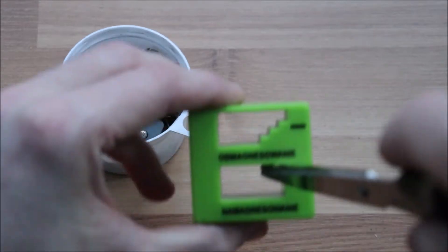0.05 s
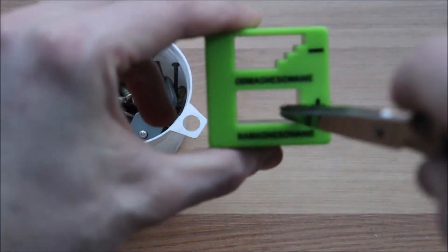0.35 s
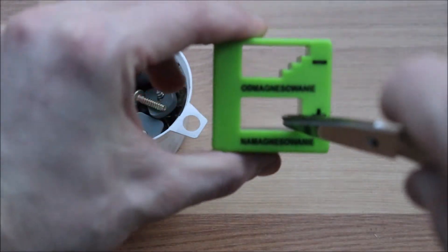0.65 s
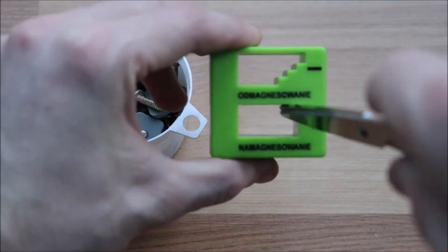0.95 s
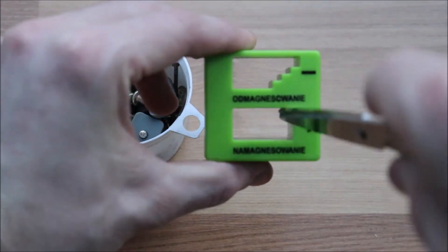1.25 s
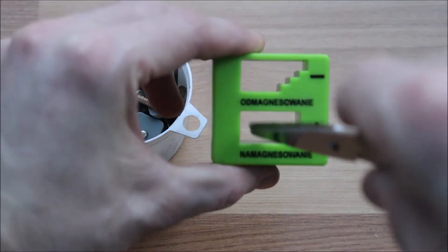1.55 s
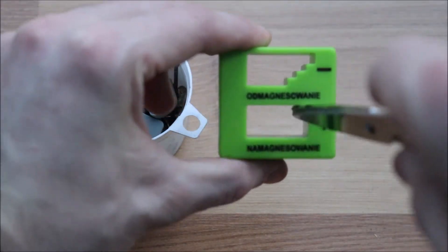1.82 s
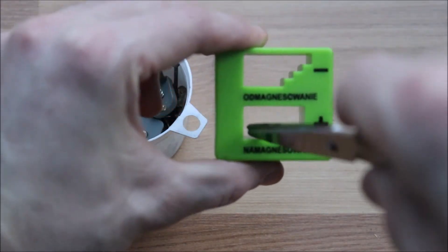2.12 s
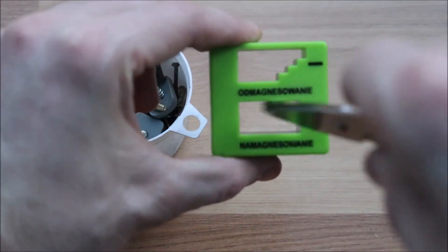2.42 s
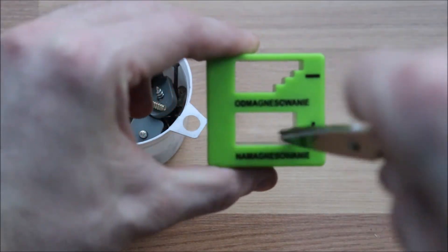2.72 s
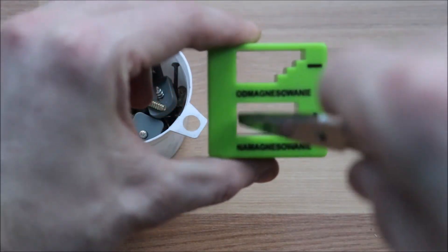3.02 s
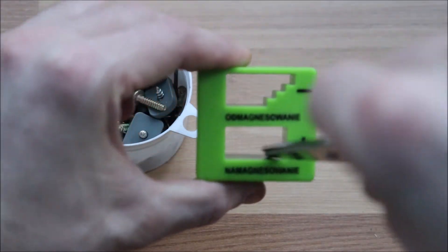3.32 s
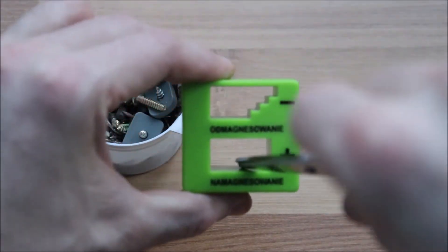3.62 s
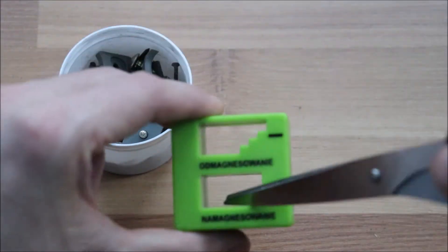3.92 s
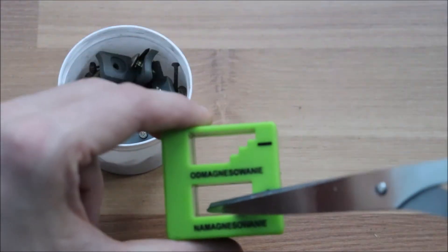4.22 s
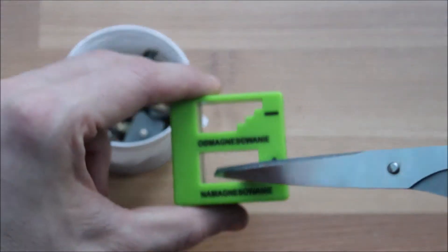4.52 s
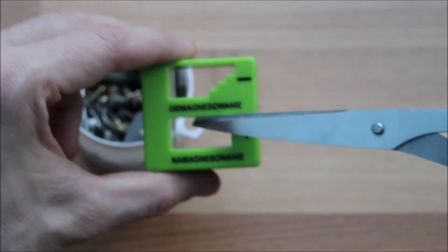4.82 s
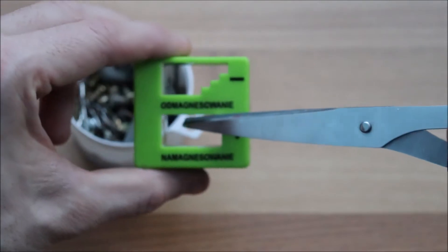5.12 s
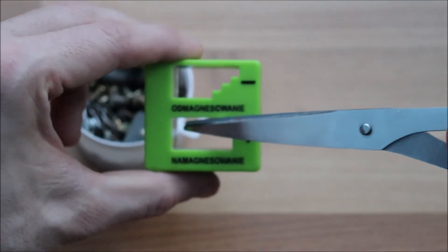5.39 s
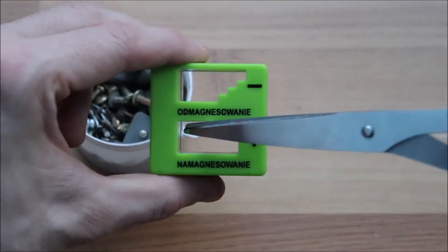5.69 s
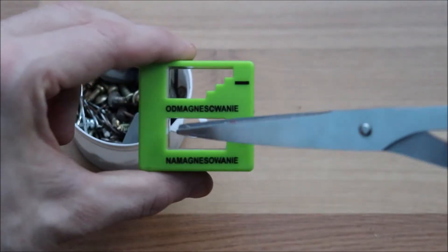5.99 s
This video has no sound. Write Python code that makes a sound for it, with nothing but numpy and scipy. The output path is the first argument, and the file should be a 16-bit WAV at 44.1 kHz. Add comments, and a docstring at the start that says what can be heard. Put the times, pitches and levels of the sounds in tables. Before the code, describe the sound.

Fingers rub faintly on a small plastic magnetizer, and at about 0.3 seconds a steel scissor blade hits the end of its slot with a hollow snap, followed by a few light ticks. From 1 to 3.3 seconds the blade is stroked to and fro five times, roughly two strokes a second. Hard, bright snaps near 1, 1.4, 1.9, 2.5 and 2.9 seconds alternate with softer clacks on the way back. Between them the steel scrapes briefly, catches and ticks along the plastic, getting busier toward 3 seconds. Then it turns sparse: faint grazes, a light tap near 4 seconds, soft finger rubs and bumps around 4.4, a short scrape into a clearer hollow click at 4.7, and a smaller tap at 5.4. The hand settles softly near 6 seconds. Everything is very close, in stereo, in a small quiet room with faint background hiss.

```python
"""Scissor blade in a magnetizer

Close stereo pair, just above a wooden table in a small quiet room. A steel blade is stroked five times
to and fro through the slot of a hand-held plastic magnetizer. The magnets snap it against the upper and
lower bar in turn; between the snaps it scrapes and ticks along the plastic. Fingers shift on the case."""
import sys
import numpy as np
from scipy import signal
from scipy.fft import rfft, irfft, next_fast_len
from scipy.io import wavfile
from scipy.ndimage import uniform_filter1d, map_coordinates

SR = 44100
rng = np.random.default_rng(int(sys.argv[2]) if len(sys.argv) > 2 else 0)


def log_audio(samples):
    """Write samples as a 16-bit WAV file to the path given in sys.argv[1]."""
    # one column per channel
    frames = np.atleast_2d(samples).T
    # limit to full scale, then quantise
    limited = np.clip(frames, -1, 1)
    pcm = np.round(limited * 32767).astype(np.int16)
    wavfile.write(sys.argv[1], SR, pcm)


N = 271215
LEN = 16384  # samples in one contact with its tail
T, HZ = np.arange(LEN) / SR, np.fft.rfftfreq(LEN, 1 / SR)

# Snap and contact levels are relative within each source; tilt is brightness above 1 kHz.
# strokes on the upper bar: t/s, snap/dB, tilt/(dB/octave), run-in/dB, length/s, slide/dB
UPPER_STROKES = [(0.9666, -6, .5, -42.5, 0.18, -61), (1.3594, -10, 0.5, -40.5, 0.2, -51.5),
                 (1.8907, -10, -2.5, -48, 0.18, -46.5), (2.4569, -4.5, -1, -62, .12, -41.5),
                 (2.9404, -6, -2, -54, .123, -39.5)]
# return strokes on the lower bar: t/s, snap/dB, length/s, slide/dB
LOWER_STROKES = [(1.2251, -16, 0.072, -56), (1.694, -14.5, .092, -46), (2.175, -11.5, 0.17, -41.5),
                 (2.713, -13, .11, -38), (3.1684, -12, 0.11, -36.5)]
# the sliding edge catches, fingers bump the case: t/s, level/dB
CATCHES = [(.634, -45), (1.476, -32), (1.780, -27), (2.264, -28.5), (2.288, -21), (2.348, -33.5),
           (2.758, -24), (2.788, -22.5), (3.008, -23.5)]
BUMPS = [(1.619, -39.5), (4.369, -51.5), (4.487, -55), (4.610, -52)]
# the loose blade taps the slot: t/s, level/dB, tilt/(dB/octave), hollow case/dB
TAPS = [(.461, -31, -3.5, -2), (.777, -45.5, 4.5, 16), (.927, -45, -2, 8), (1.3033, -24, -3.5, -2),
        (1.820, -32.5, -6, -7), (2.632, -27.5, 0, -3), (2.851, -31.5, -5, -7), (3.0722, -16, 0, -3),
        (3.962, -36, -4.5, -4.5), (4.746, -22.5, -1.5, 5.5), (5.064, -44, 5.5, -4.5),
        (5.354, -31.5, -2.5, 5)]
# the loose blade grazes the lower bar: t/s, level/dB, tilt/(dB/octave)
GRAZES = [(.75, -53, -4.5), (3.437, -57.5, 3), (3.575, -62, 6.5), (3.771, -58.5, 2), (5.555, -61, 5)]
# skin rubs on the case: middle t/s, time to fall by 6 dB/s, level/dB
GRIP_SHIFTS = [(.33, 0.4, -56.5), (4.32, 0.12, -57.5)]

# ring of the case at each kind of contact, and of the free steel: f/Hz, level/dB, t60/s
UPPER_MODES = [(1545, -9, .045), (1720, -11, .03), (2135, -15, .04), (2920, -10, .05), (3610, -12, .06),
               (3850, -5, .016), (4000, -5, .045), (4170, -9, .06), (4418, -9, .09), (4610, -8, .05),
               (4883, -13, .08), (5000, -16, .08), (5150, -14, .04), (5600, -15, .04)]
LOWER_MODES = [(1535, -5, .06), (1892, -8, .07), (2135, -10, .035), (2850, 1, .026), (3200, -12, .05),
               (3450, -2, .02), (3630, -6, .035), (4005, -7, .022), (4190, -8, .05)]
END_MODES = [(1477, -4.5, 0.059), (1804, -2, 0.02), (1960, 1, 0.049), (2280, -7, 0.036), (2960, -5, 0.038),
             (3360, -2, .035), (3920, -7, 0.015), (4180, 0.5, 0.041)]
CATCH_MODES = [(1513, -8, 0.16), (1887, -1, 0.084), (2880, 0, 0.035), (2860, 2.5, .05), (3536, 2.5, 0.021),
               (4280, -18, .03)]
TAP_MODES = [(662, -7.5, 0.02), (1558, 3, 0.044), (1813, -2, 0.042), (2440, -6, .025), (2810, 0, 0.042),
             (3540, 1, 0.061), (4020, -2.5, 0.041), (5600, -16, 0.0295)]
BUMP_MODES = [(520, 2, 0.036), (1180, -4, 0.026), (1330, -4, 0.019)]
BLADE_MODES = [(3640, 10, 0.35), (1490, -7, .2), (1860, -0.5, 0.26)]
# resonances under the sliding edge, the dragging tip and a fingertip: f/Hz, width/Hz, level/dB
UPPER_BODY = [(533, 46, -7), (720, 79, -7.5), (1535, 45, 5.5), (1930, 15, 10), (2850, 140, -4),
              (3470, 30, 3.5), (4100, 250, -1.5), (5050, 150, -8.5), (8840, 450, -11.5),
              (14600, 590, -14.5)]
LOWER_BODY = [(1034, 27, -3.5), (1480, 82, 0), (1978, 120, 6), (2034, 110, -6), (2600, 140, -7),
              (2740, 140, 4), (3460, 340, -3.5), (4110, 310, -2.5), (6600, 430, -13.5), (9200, 400, -18),
              (13300, 500, -14)]
RUN_IN_BODY = [(700, 120, 4), (1570, 80, 1.5), (1920, 60, 6), (3700, 60, 14.5), (4120, 330, 0),
               (5050, 200, -3.5), (6280, 120, -9), (8940, 1200, -13)]
FINGER_BODY = [(493, 250, 0), (795, 320, 4.5), (1400, 110, 9.5), (1640, 270, 4)]
# spectra of the blows on the plastic: f/Hz, level/dB
UPPER_CRACK = [(76, -42.5), (130, -31.5), (1220, -20.5), (1580, -8), (2560, -13.5), (2830, -5.5),
               (3260, -9), (3910, 3), (4320, -7), (4980, -7.5), (6340, -16.5), (8400, -16.5),
               (12300, -31.5), (14500, -25), (16000, -35.5)]
LOWER_CRACK = [(76, -63.5), (130, -26), (678, -11.5), (1220, -13), (1490, -8.5), (1930, -3), (2560, -9),
               (2890, 9), (3130, -12), (3500, 4.5), (3950, -1.5), (4590, -10), (6400, -10.5), (8570, -18),
               (11100, -26.5), (13600, -20.5), (16000, -40)]
END_CRACK = [(76, -35), (130, -19), (1190, -9.5), (1460, -7), (1930, 3), (2670, -11.5), (3830, -2.5),
             (4500, -9.5), (5500, -11.5), (7440, -21.5), (8570, -13.5), (9480, -26), (16000, -36)]
TICK_CRACK = [(100, -32), (250, -6), (700, -3), (1200, -6.5), (1600, -6.5), (3000, 2.5), (4500, 0.5),
              (6500, -6), (9000, -7.5), (11000, -16), (16000, -21)]
FINGER_THUD = [(100, -4), (300, 0), (520, -11), (900, -9), (1450, 0), (2000, -27), (6000, -34),
               (16000, -31)]
# spectra of scraping, rubbing skin, still air and the room's reflections: f/Hz, level/dB
GRIT_COLOUR = [(100, -26.5), (300, -20), (700, -7.5), (1300, -13), (3500, -5.5), (5500, -11), (7000, -12),
               (11000, -21), (13500, -24), (16000, -24)]
SKIN_COLOUR = [(100, -38), (220, 0), (340, -4), (600, -10.5), (1400, -8.5), (3000, -19), (9000, -26.5),
               (16000, -39)]
AIR_COLOUR = [(12, -48), (20, -18), (146, -5.5), (422, -9), (660, -12.5), (759, -11.5), (949, -13.5),
              (1480, -13.5), (2260, -16), (2460, -17), (2910, -17), (3250, -17.5), (3950, -18), (5380, -20),
              (16000, -29.5)]
ROOM_COLOUR = [(100, -8), (200, -7.5), (560, 3), (870, -1.5), (1080, 8.5), (1400, -0.5), (3000, 0),
               (3900, -2.5), (4400, 2.5), (9000, 0), (16000, 8)]
# decay of the small room: f/Hz, t60/s
ROOM_DECAY = [(200, 0.6), (550, 0.53), (1500, 0.41), (4000, 0.37), (9000, 0.36), (16000, 0.12)]
# side signal of the microphone pair: f/Hz, gain/dB
SIDE_GAIN = [(30, -5), (125, -4), (300, -4.5), (600, -3.5), (1200, -2), (2500, 0), (16000, 0.5)]


def upper_bar():
    """Right at the microphones the blade runs in, snaps hard against the upper bar and glides on."""
    out = np.zeros((2, N))
    for s, db, tilt, run_in_db, length, slide_db in UPPER_STROKES:
        snap = voiced([(s, db)], tilt, knock_db=1.1, hollow_db=-0.2)
        out += run_in(s, run_in_db, tilt=4.1)
        out += contacts(snap, UPPER_CRACK, UPPER_MODES, gain_db=14.5, blow_db=-13, ring_db=-8.5,
                        blade_db=-52, t60=0.011, rise=0.0014, wet_db=-7, pan_db=-0.5)
        out += slides([slide_of(s, length, slide_db, tilt=-0.6)], UPPER_BODY, body_db=1.5,
                      slips_per_s=450, slip_db=-1.5, ramp_share=0.18, wet_db=-8.5)
    return out


def lower_bar():
    """On the way back the blade clacks against the lower bar and rasps along it."""
    out = np.zeros((2, N))
    for s, db, length, slide_db in LOWER_STROKES:
        snap = voiced([(s, db)], tilt=0.73, knock_db=2.2, hollow_db=-1.1)
        out += contacts(snap, LOWER_CRACK, LOWER_MODES, gain_db=13.5, blow_db=-7, ring_db=-4.5,
                        blade_db=-41, t60=0.014, rise=0.0005, wet_db=-7.5, pan_db=-1.9)
        out += slides([slide_of(s, length, slide_db, tilt=0.44)], LOWER_BODY, body_db=6,
                      slips_per_s=700, slip_db=-7.5, ramp_share=0.3, wet_db=-4.5)
    return out


def end_wall(s=0.3372, db=-9.5):
    """One hollow snap as the entering blade hits the end wall of the slot."""
    snap = voiced([(s, db)], tilt=1, knock_db=-1, hollow_db=2)
    return contacts(snap, END_CRACK, END_MODES, gain_db=13, blow_db=-3, ring_db=-3.5,
                    blade_db=-37, t60=0.018, rise=0.00054, wet_db=-7, pan_db=-1.5)


def run_in(arrival_s, db, tilt, length_s=0.044):
    """The steel sings as its tip drags ever harder, pulled home by the magnet."""
    return slides([(arrival_s - length_s, length_s, db, tilt)], RUN_IN_BODY, body_db=1.5,
                  slips_per_s=350, slip_db=-9.5, ramp_share=0.068, wet_db=-7, swell_db=11.5)


def catches():
    """Now and then the sliding edge catches and chatters."""
    rows = voiced(CATCHES, tilt=-1.4, knock_db=-4.5, hollow_db=-2.5)
    return contacts(rows, TICK_CRACK, CATCH_MODES, gain_db=15, blow_db=-15, ring_db=0.5,
                    blade_db=-29, t60=0.024, rise=0.0009, wet_db=-8.5, pan_db=-3)


def loose_blade(knock_db=-2.5, knock_per_hollow=0.13, graze_s=0.039):
    """Taps, grazes and a last push into the slot; a looser grip lets the case knock and sound hollow."""
    rows = [(s, db, tilt, knock_db + knock_per_hollow * hollow, hollow) for s, db, tilt, hollow in TAPS]
    taps = contacts(rows, TICK_CRACK, TAP_MODES, gain_db=12, blow_db=-5, ring_db=-2,
                    blade_db=-13, t60=0.023, rise=0.00065, wet_db=-7, pan_db=-1)
    grazes = slides([(s, graze_s, db, tilt) for s, db, tilt in GRAZES], LOWER_BODY, body_db=-2.5,
                    slips_per_s=3400, slip_db=6, ramp_share=0.27, wet_db=-8)
    return taps + grazes + run_in(arrival_s=4.75, db=-38.5, tilt=0.5)


def fingers(slip_at_s=0.00096, slip_length_s=0.0372, slip_level_db=-48, slip_tilt=0.6, fidget_db=-52):
    """Skin rubs, a fingertip slips, and soft bumps on the case sit left of centre."""
    t = np.arange(N) / SR
    grip = sum(amp(db) * 0.5 ** (((t - s) / width) ** 2) for s, width, db in GRIP_SHIFTS)
    rub = grip * steady_noise(SKIN_COLOUR, side_db=-5)
    slip = slides([(slip_at_s, slip_length_s, slip_level_db, slip_tilt)], FINGER_BODY, body_db=2.5,
                  slips_per_s=380, slip_db=-12, ramp_share=0.053, wet_db=-4)
    fidgets = [(s, fidget_db) for s in rng.uniform(5.6, 6.1, 3)]  # the hand settles
    rows = voiced(BUMPS + fidgets, tilt=-3.5, knock_db=-6, hollow_db=1)
    bumps = contacts(rows, FINGER_THUD, BUMP_MODES, gain_db=17.5, blow_db=-19, ring_db=-3.5,
                     blade_db=-40, t60=0.025, rise=0.00173, wet_db=-12, pan_db=5)
    return rub + slip + bumps


def contacts(rows, colour, modes, gain_db, blow_db, ring_db, blade_db, t60, rise, wet_db, pan_db):
    """Hits on the plastic: a short crack, the ring of the case and a faint note from the blade."""
    out = np.zeros((2, N))
    for s, db, tilt, knock_db, hollow_db in rows:
        blow = crack(colour, t60, rise, blow_db)
        case = amp(ring_db) * ring(modes, scatter_db=1, rise=0.00019, spread_rad=0.42)
        hit = irfft(rfft(unit_energy(blow + case)) * case_tone(tilt, knock_db, hollow_db))
        note = amp(blade_db) * ring(BLADE_MODES, scatter_db=1.5, rise=0.00077, spread_rad=0.41)
        add(out, s, amp(db + gain_db) * (in_room(hit, wet_db) + note))
    return out * amp([[pan_db / 2], [-pan_db / 2]])


def voiced(events, tilt, knock_db, hollow_db):
    """Contacts of one kind share a tone."""
    return [(s, db, tilt, knock_db, hollow_db) for s, db in events]


def crack(colour, t60, rise, blow_db):
    """One sharp blow and a moment of chatter, evened out in spectrum and then coloured."""
    force = unit_energy(pair_noise(LEN, side_db=-8) * fade(T, t60) * (1 - np.exp(-T / rise)))
    force[:, round(rise * SR)] += amp(blow_db)
    spectrum = rfft(force)
    power = uniform_filter1d(np.mean(np.abs(spectrum) ** 2, axis=0), size=160)
    ripple_db = 10 * np.log10(np.abs(power) + 1e-9)
    return unit_energy(irfft(spectrum * minimum_phase(along(colour, HZ) - ripple_db)))


def ring(modes, scatter_db, rise, spread_rad):
    """Damped modes, struck at new strengths each time, reach each microphone in a different phase."""
    out = np.zeros((2, LEN))
    for hz, db, t60 in modes:
        phase = rng.uniform(0, 2 * np.pi) + spread_rad * rng.standard_normal((2, 1))
        strength = amp(db + scatter_db * rng.standard_normal())
        out += strength * fade(T, t60) * np.sin(2 * np.pi * hz * T + phase)
    return unit_energy(out * (1 - np.exp(-T / rise)))


def case_tone(tilt, knock_db=0, hollow_db=0, case_hz=1680, low_hz=185, thump_hz=255, thump_db=2):
    """A harder contact is brighter, a heavier one adds bass, a loose grip lets the hollow case speak."""
    def hump(hz, octaves):
        return np.exp(-(np.log2((HZ + 1) / hz) / octaves) ** 2)
    bright = tilt * np.log2(np.clip(HZ, 1000, None) / 3000)
    knock = knock_db / (1 + (HZ / 900) ** 4)
    humps = hollow_db * hump(case_hz, octaves=0.29) + thump_db * hump(thump_hz, octaves=0.53)
    bass_loss = 10 * np.log10(1 + (low_hz / np.maximum(HZ, low_hz / 2)) ** 4)  # the case is small
    return minimum_phase(bright + knock + humps - bass_loss)


def slides(rows, body, body_db, slips_per_s, slip_db, ramp_share, wet_db,
           swell_db=0, judder_db=0.7, judder_hz=130):
    """Stick and slip over the plastic: the tiny slips hiss and excite the resonances."""
    out = np.zeros((2, N))
    resonance = sum((-1) ** k * amp(db) * 1j * HZ * width / (hz ** 2 - HZ ** 2 + 1j * HZ * width)
                    for k, (hz, width, db) in enumerate(body))
    power = amp(along(GRIT_COLOUR, HZ)) ** 2 + np.abs(amp(body_db) * resonance) ** 2
    response = minimum_phase(10 * np.log10(power))
    for s, length, db, tilt in rows:
        slips = (rng.random(LEN) < slips_per_s / SR) * rng.lognormal(0, 0.3, LEN)
        force = unit_rms(pair_noise(LEN, side_db=-4)) + amp(slip_db) * unit_rms(slips - slips.mean())
        ramp = np.clip(np.minimum(T, length - T) / (ramp_share * length), 0, 1)
        pressure = np.sin(np.pi / 2 * ramp) * amp(swell_db * (np.minimum(T / length, 1) - 1))
        # the hand never pulls evenly
        judder = amp(judder_db * map_coordinates(rng.standard_normal(LEN), [T * judder_hz]))
        colour = unit_rms(np.abs(response * case_tone(tilt))) * np.exp(1j * np.angle(response))
        scrape = irfft(rfft(unit_rms(force) * pressure * judder) * colour)
        add(out, s, amp(db) * in_room(scrape, wet_db))
    return out


def slide_of(s, length, db, tilt, wait_share=0.44):
    """The edge slides only in the later part of a stroke."""
    return s + wait_share * length, (1 - wait_share) * length, db, tilt


def in_room(direct, wet_db, delay_s=0.0034, build_s=0.0037):
    """Close direct sound, then the small room's diffuse tail, which dies sooner in the treble."""
    hz, t, noise = signal.stft(rng.standard_normal((2, LEN)), SR, nperseg=256)
    decay = fade(t, along(ROOM_DECAY, hz)[:, None])
    tail = signal.istft(noise * decay, SR, nperseg=256)[1][:, :LEN]
    near_walls = 1 + 1.03 * fade(T, t60=0.21)  # they answer first and strongest
    tail *= near_walls * np.clip((T - delay_s) / build_s, 0, 1)
    tail = irfft(rfft(unit_energy(tail)) * minimum_phase(along(ROOM_COLOUR, HZ)))
    return direct + amp(wet_db) * signal.fftconvolve(direct, tail, axes=1)[:, :LEN]


def room_tone():
    """Still air, wide in the pair, with a low fuzzy hum near the centre."""
    hum_colour = [(90, -60), (112, -8), (121, -1), (130, -25), (155, -53)]  # f/Hz, level/dB
    hum = steady_noise(hum_colour, side_db=-13)
    return amp(-59) * steady_noise(AIR_COLOUR, side_db=1) + amp(-76) * hum


def steady_noise(colour, side_db):
    """Coloured stereo noise of rms 1."""
    size = next_fast_len(N)
    gain = amp(along(colour, np.fft.rfftfreq(size, 1 / SR)))
    return unit_rms(irfft(rfft(pair_noise(size, side_db)) * gain, size)[:, :N])


def pair_noise(size, side_db):
    """White noise as two close microphones share it."""
    mid, side = rng.standard_normal((2, size))
    return np.array([mid + amp(side_db) * side, mid - amp(side_db) * side])


def minimum_phase(db):
    """Causal response with the given gains."""
    cepstrum = irfft(np.log(amp(db)))
    cepstrum[1:LEN // 2] *= 2
    cepstrum[LEN // 2 + 1:] = 0
    return np.exp(rfft(cepstrum))


def amp(db):
    """Decibels to gain."""
    return 10 ** (np.asarray(db) / 20)


def fade(t, t60):
    """Decay by 60 dB in t60 seconds."""
    return np.exp(-np.log(1000) * t / t60)


def unit_rms(x):
    """Scale to rms 1."""
    return x / np.sqrt(np.mean(x ** 2) + 1e-20)


def unit_energy(x):
    """Scale to a mean energy of 1 per channel."""
    return unit_rms(x) / np.sqrt(x.shape[-1])


def along(points, hz):
    """Read a curve on a log frequency axis."""
    freqs, values = np.transpose(points)
    return np.interp(np.log(hz + 1), np.log(freqs + 1), values)


def add(track, s, sound):
    """Mix a stereo sound into the track at s seconds."""
    start = max(round(s * SR), 0)
    track[:, start:start + sound.shape[-1]] += sound[..., :N - start]


def scene():
    """Five strokes to and fro and stray touches up close, over the handling and the room."""
    return end_wall() + upper_bar() + lower_bar() + catches() + loose_blade() + fingers() + room_tone()


def record(dry):
    """A closely spaced microphone pair: narrower in the bass, with a steep cut in the top treble."""
    top_hz = 16050
    size = next_fast_len(N + LEN)
    hz = np.fft.rfftfreq(size, 1 / SR)
    left, right = rfft(dry, size) / (1 + (hz / top_hz) ** 110)
    mid = (left + right) / 2
    side = (left - right) / 2 * amp(along(SIDE_GAIN, hz))
    return irfft(np.array([mid + side, mid - side]), size)[:, :N]


dry = scene()
out = record(dry)
log_audio(out)
```